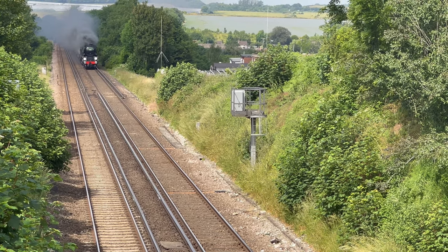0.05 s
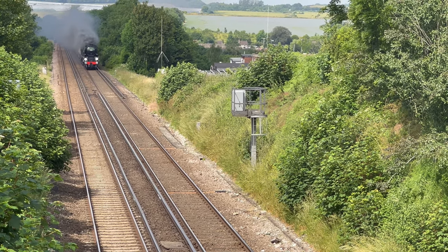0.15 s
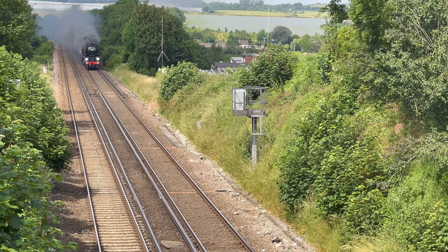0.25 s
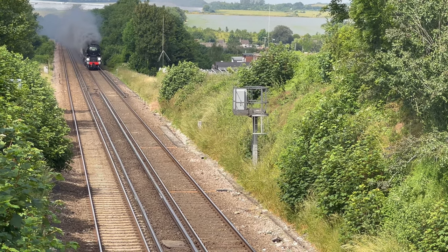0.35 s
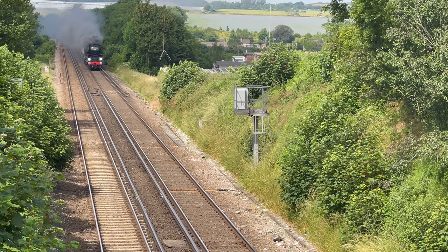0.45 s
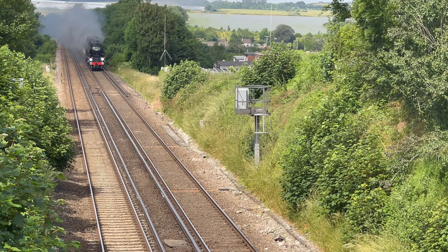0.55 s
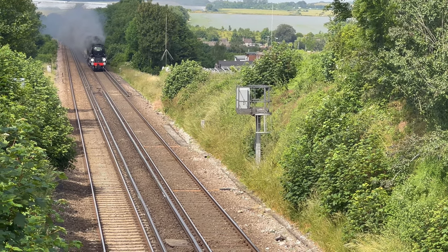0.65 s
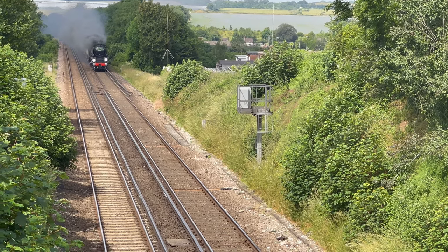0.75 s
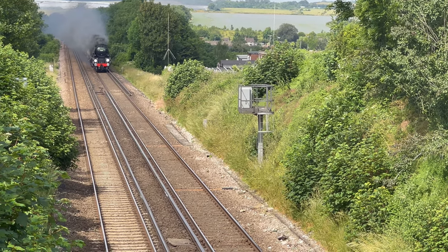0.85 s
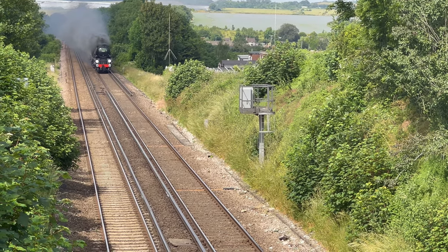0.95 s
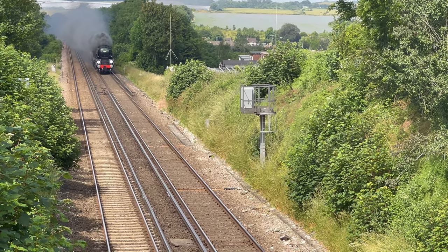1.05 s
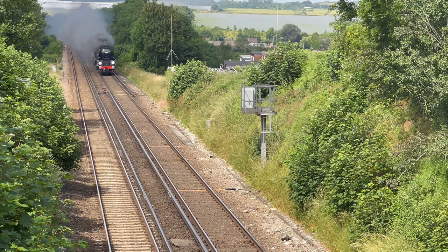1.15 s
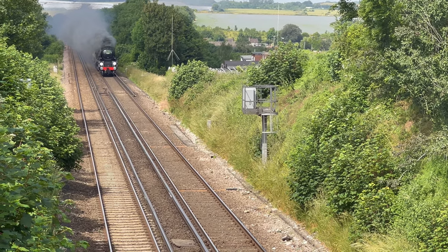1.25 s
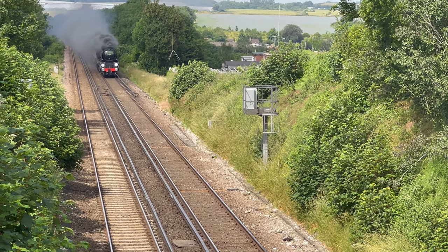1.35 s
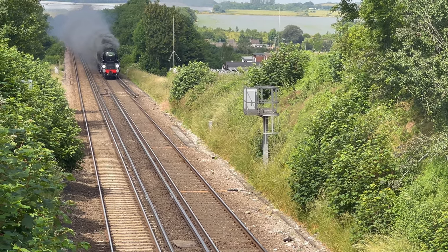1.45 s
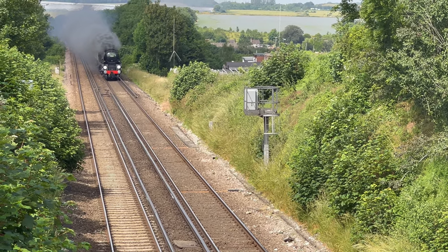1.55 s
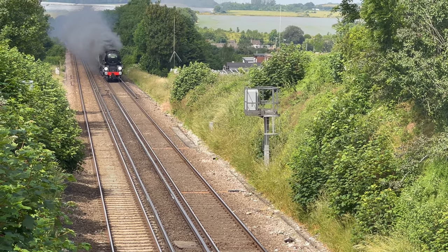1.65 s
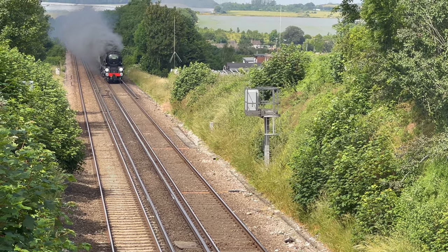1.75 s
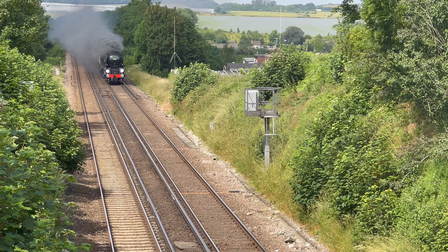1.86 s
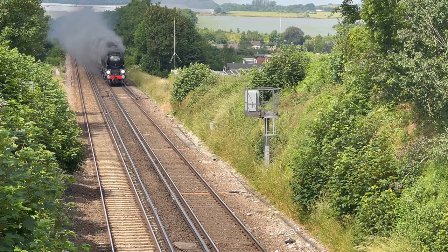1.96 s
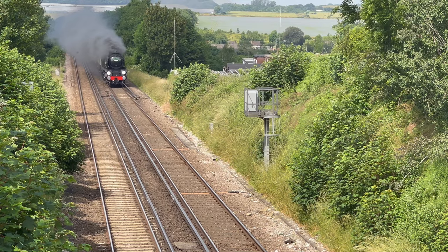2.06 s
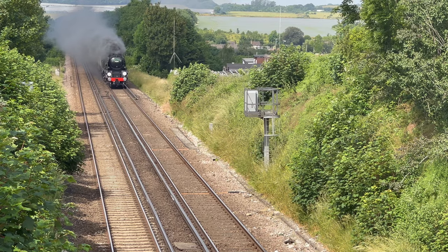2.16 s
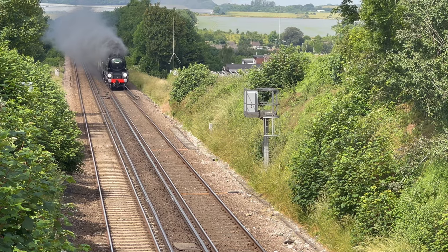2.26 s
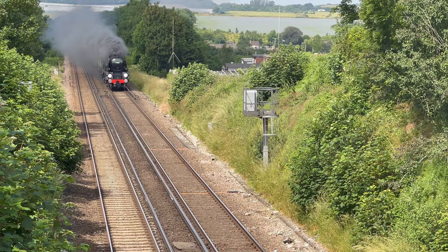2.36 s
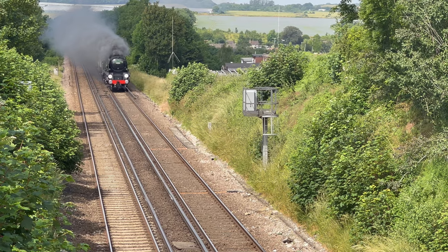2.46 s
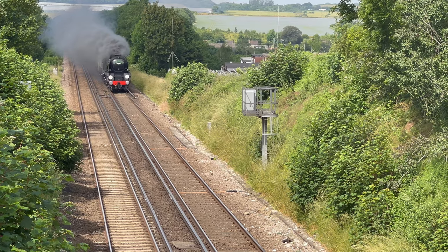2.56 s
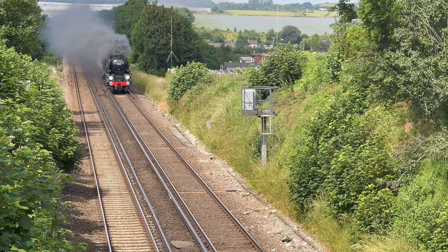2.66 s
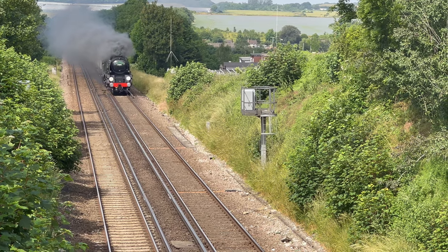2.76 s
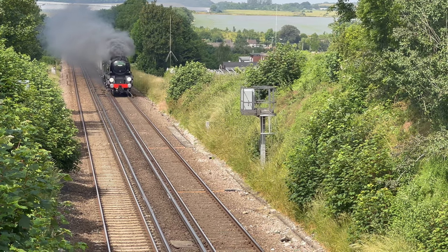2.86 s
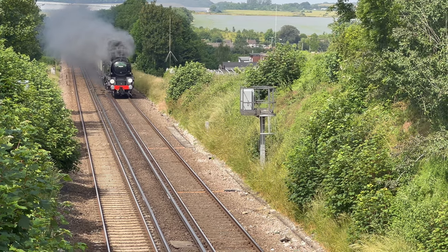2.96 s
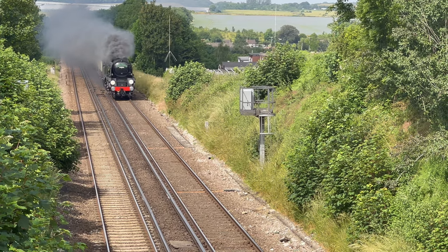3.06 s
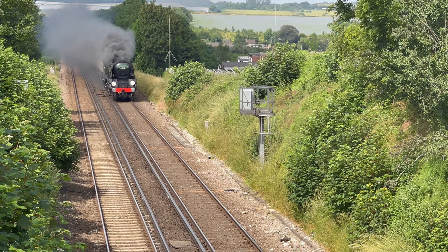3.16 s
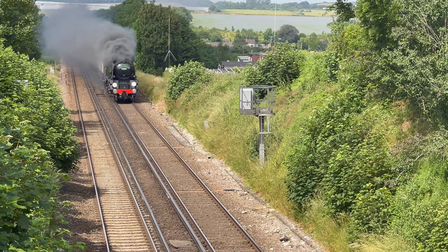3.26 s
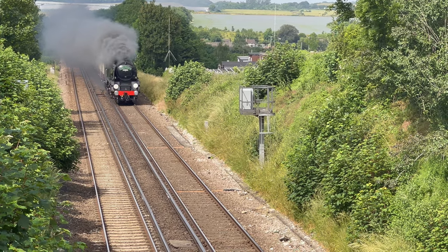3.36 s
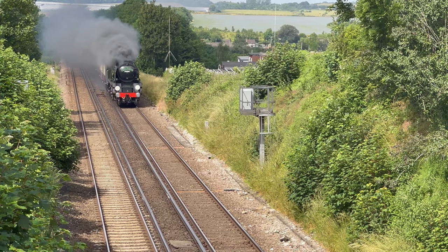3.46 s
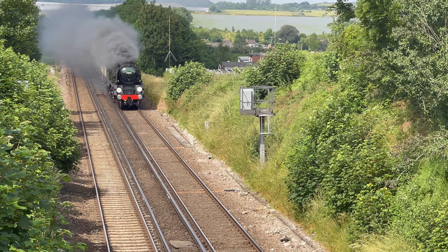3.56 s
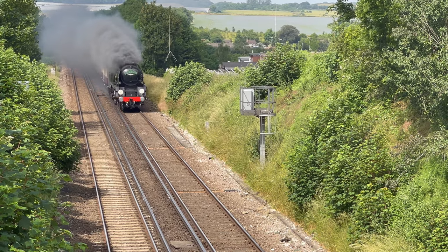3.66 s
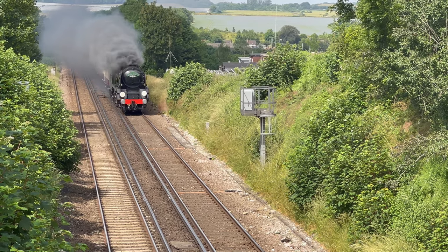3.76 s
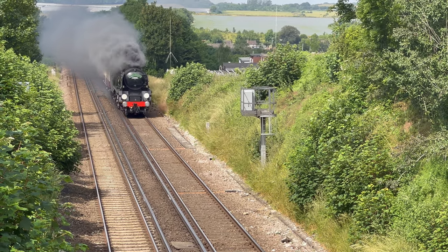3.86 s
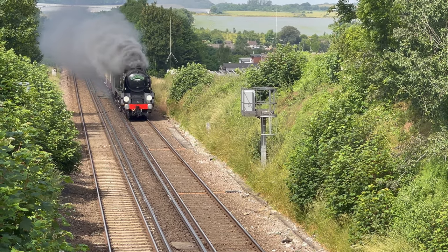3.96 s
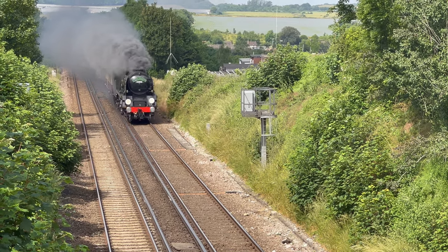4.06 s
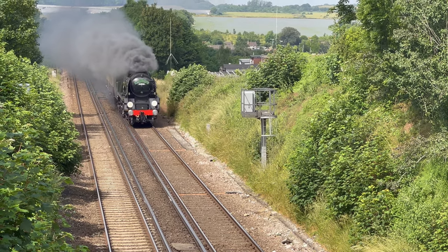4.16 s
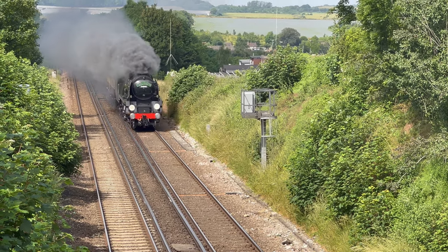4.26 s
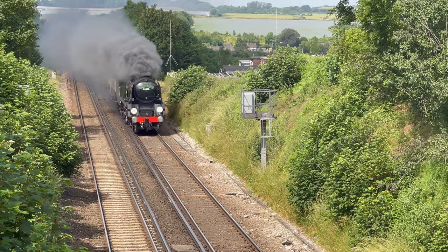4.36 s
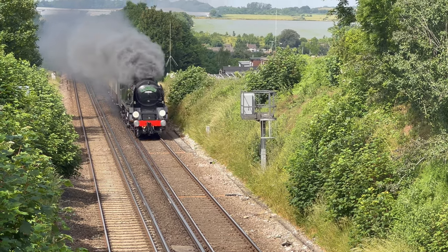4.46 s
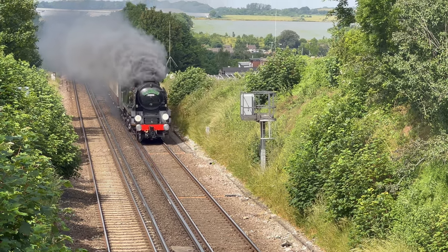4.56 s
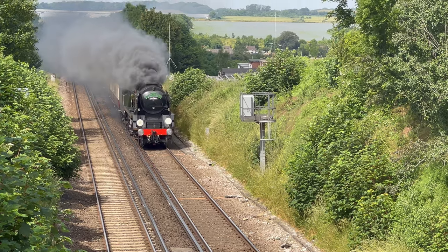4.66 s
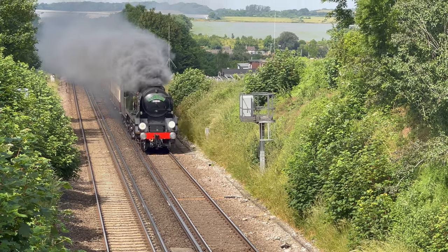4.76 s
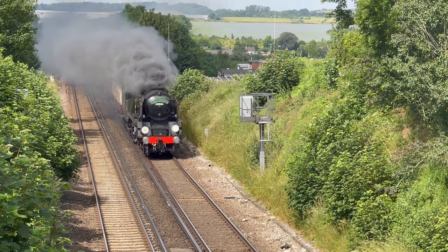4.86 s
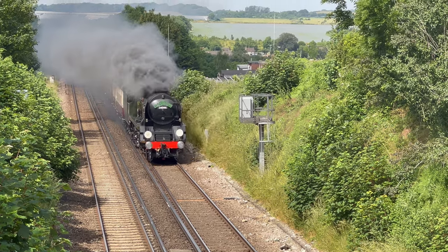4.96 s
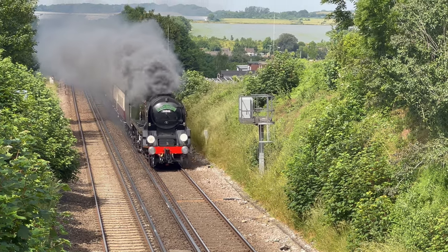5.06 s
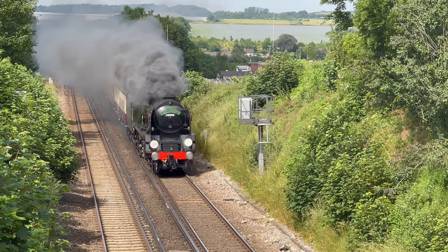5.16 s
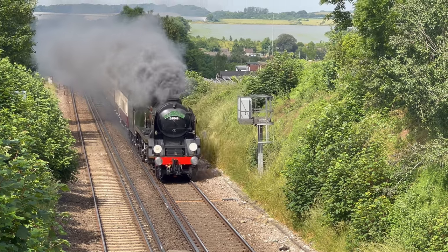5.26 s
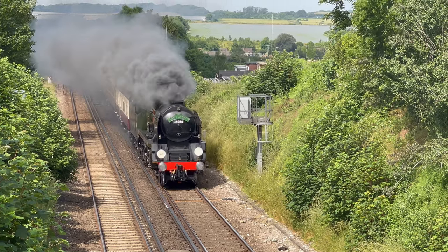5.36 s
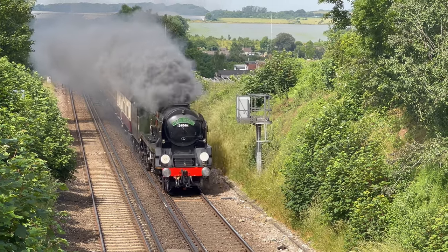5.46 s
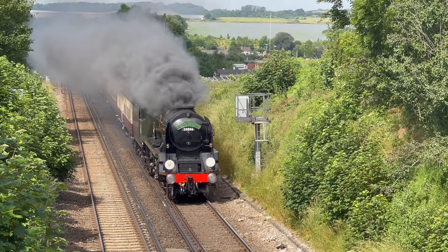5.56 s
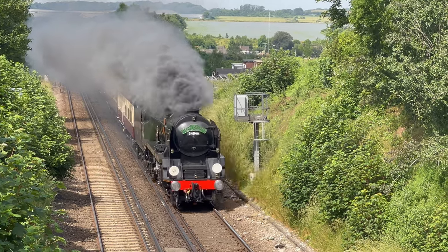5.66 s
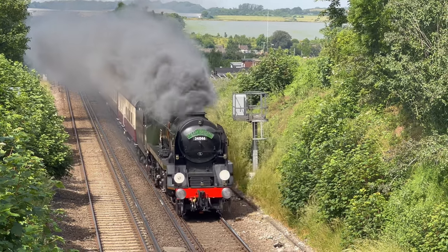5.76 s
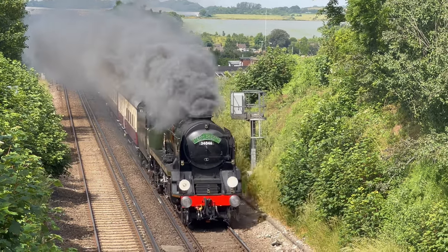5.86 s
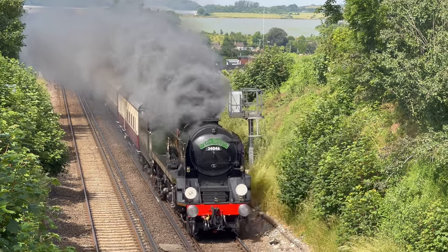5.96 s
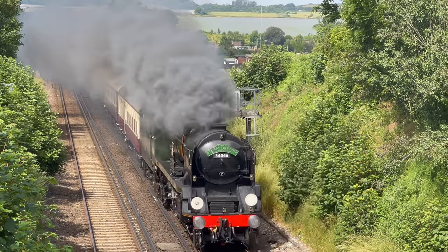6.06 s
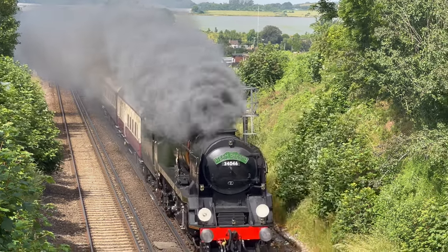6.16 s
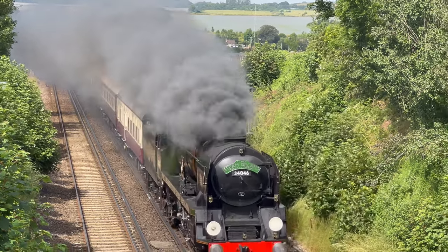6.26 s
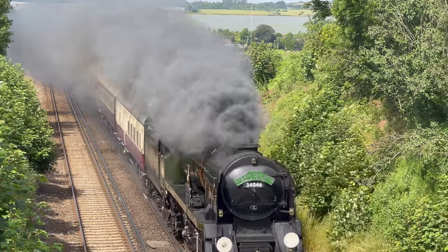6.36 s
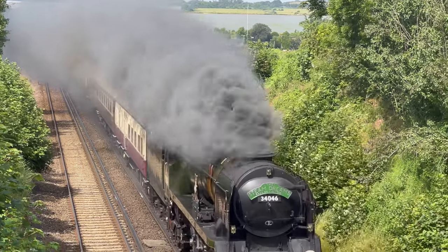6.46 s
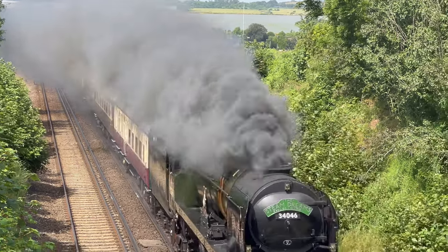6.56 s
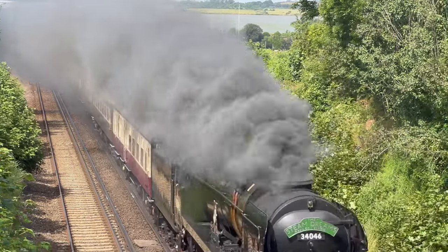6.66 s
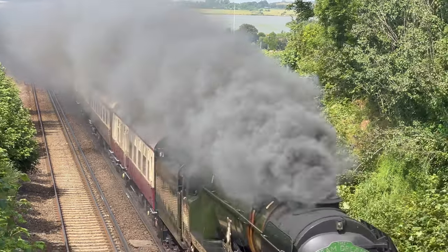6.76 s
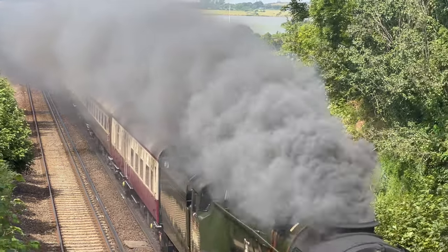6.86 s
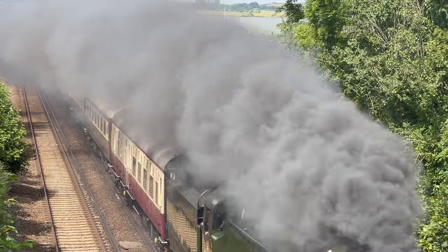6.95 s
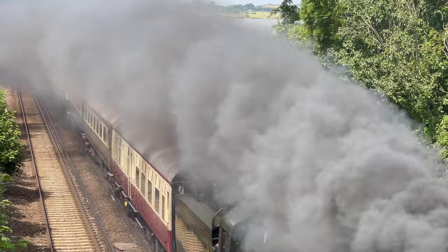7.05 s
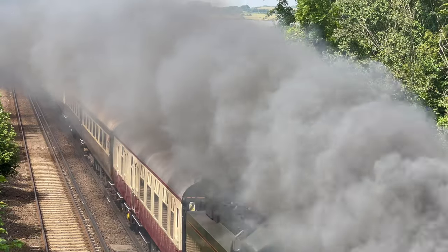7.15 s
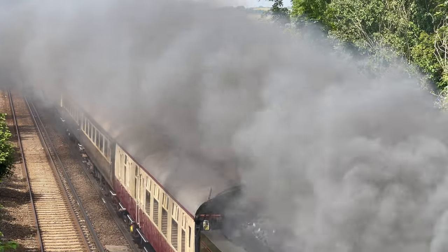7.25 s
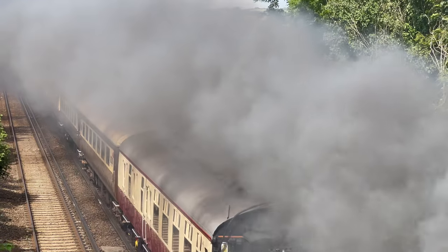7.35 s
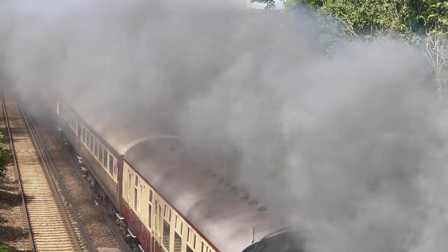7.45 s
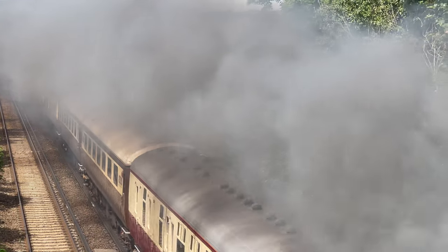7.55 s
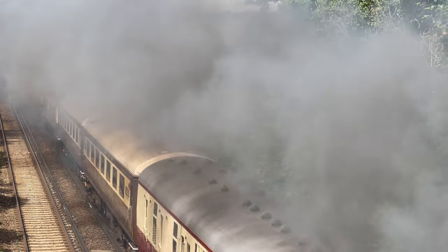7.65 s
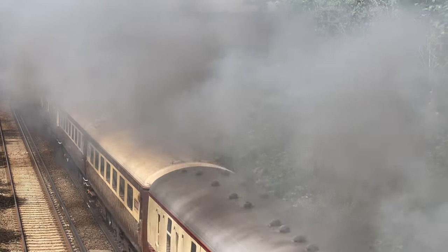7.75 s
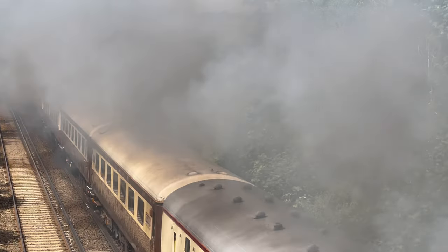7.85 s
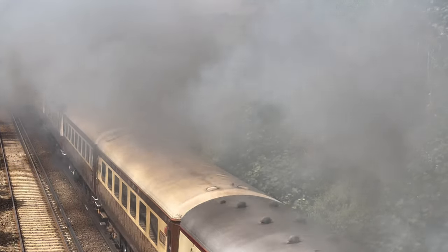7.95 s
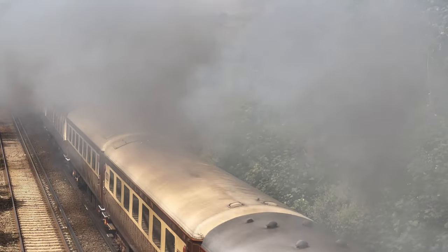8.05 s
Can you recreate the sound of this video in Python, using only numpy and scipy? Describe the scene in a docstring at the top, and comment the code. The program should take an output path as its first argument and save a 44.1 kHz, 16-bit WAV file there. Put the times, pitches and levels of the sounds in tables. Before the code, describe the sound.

A road vehicle drones by, slows and fades to the right. Far off, a steam locomotive chuffs in a rapid, low rhythm, growing steadily louder with a roar, wheel noise and hiss. The rails sing ahead of it, a few wheel clanks ring out and two soft knocks sound nearby. Heard from a bridge over a cutting, the engine passes directly below with a bright spurt of steam and a hollow boom, coaches rolling behind.

```python
"""A road vehicle drones past and slows, while far off a steam locomotive works up a cutting towards a bridge.
Its exhaust rings the chimney in thuds, about seventeen a second, over roar, wheel noise and steam hiss.
The rails sing ahead of it, wheels clank over rail joints and two soft knocks sound close by.
A little after seven seconds the engine passes under the listener with a bright spurt of steam
and a hollow boom, coaches behind it."""
import sys
import numpy as np
from scipy import signal
from scipy.fft import rfft, irfft, next_fast_len
from scipy.io import wavfile
from scipy.ndimage import uniform_filter1d

SR = 44100
rng = np.random.default_rng(int(sys.argv[2]) if len(sys.argv) > 2 else 0)


def bounce(signal):
    """Save signal as a 16-bit WAV file at the path given by the first command-line argument."""
    frames = np.transpose(np.atleast_2d(signal))
    limited = np.clip(frames, -1, 1)
    pcm = np.round(limited * 32767).astype(np.int16)
    wavfile.write(sys.argv[1], SR, pcm)


N = 357210
TIME_S = np.arange(N) / SR
FRAME, HOP = 1024, 256  # samples
BIN_HZ = np.fft.rfftfreq(FRAME, 1 / SR)
FRAME_S = np.arange(N // HOP + 5) * HOP / SR
SPEED_M_S, PASS_S, CLOSEST_M = 16.1, 7.334, 5.04  # the locomotive's run, heard at the bridge
NEARNESS = np.interp(FRAME_S, [5.6, 6.4], [0, 1])

# How alike the train's noise sounds in left and right: frequency_hz, coherence
STEREO_COHERENCE = [(60, .99), (300, .96), (1000, .92), (1450, .85), (2050, .99), (3300, .89), (5200, .92),
                    (5900, 1), (8800, 1), (9100, .9), (10250, 1), (11000, .96), (12000, 1), (13000, .7)]


def exhaust_beats():
    """Quasi-periodic pulses: three unequal cylinders exhaust in turn. Rows: peak_s, level_db, pitch_hz."""
    # Beats that stand out of the rhythm: peak_s, level_db
    heavy_beats = [(2.851, -23), (3.11, -25), (3.814, -22), (4.146, -25), (4.797, -20), (4.845, -21),
                   (5.161, -20), (5.548, -20), (5.864, -18), (6.106, -17), (6.293, -13.5), (6.699, -13),
                   (7.105, -16), (7.292, -10), (7.428, -9.5), (7.618, -11.5), (8.069, -16)]
    beats_per_s, hard_beat_s, cylinder_db = 17, 5.353, (-0.5, -1.5, -3.5)
    chimney_hz, near_rise_hz = 52.2, 8.6
    jitter_s, scatter_db, scatter_hz = 0.0048, 1.5, 4.5
    count = np.arange(-90, 50)
    later, louder, higher = rng.standard_normal((len(count), 3)).T
    peak_s = hard_beat_s + count / beats_per_s + jitter_s * later
    level_db = passing_level(peak_s, closest_db=-14.5, coming_power=0.6, leaving_power=0.5)
    level_db += np.take(cylinder_db, count % 3) + scatter_db * louder
    pitch_hz = chimney_hz + np.interp(peak_s, [6.3, 6.9], [0, near_rise_hz]) + scatter_hz * higher
    for heavy_s, heavy_db in heavy_beats:
        nearest = round((heavy_s - hard_beat_s) * beats_per_s) - count[0]
        peak_s[nearest], level_db[nearest] = heavy_s, heavy_db
    return np.transpose([peak_s, level_db, pitch_hz])[(peak_s > .1) & (peak_s < N / SR)]


def chimney_thuds(beats):
    """Pulse-excited resonance: each push of exhaust rings the chimney for a few cycles of sagging pitch."""
    out, t = np.zeros(N), np.arange(-.05, .12, 1 / SR)
    rise_s, fall_s = .016, .027
    envelope = np.exp(-(t / np.where(t < 0, rise_s, fall_s)) ** 2)
    for (peak_s, level_db, pitch_hz), offset in zip(beats, .12 * rng.standard_normal(len(beats))):
        cycles = pitch_hz * (t - 2 * t ** 2) + offset
        add(out, peak_s + t[0], gain_of(level_db) * envelope * np.cos(2 * np.pi * cycles))
    return out


def puffing(beats):
    """Amplitude modulation: a brief bump, 1 high, at every exhaust beat."""
    return sum(np.exp(-((FRAME_S - peak_s) / 0.01) ** 2) for peak_s in beats[:, 0])


def chimney_roar(beats):
    """Modulated broadband noise: the roar puffs with the beats and fills out as the engine nears."""
    # Spectrum of the distant roar: frequency_hz, density_db
    far_spectrum = [(50, -21), (85, 7), (120, -9), (165, 0.5), (210, 1.5), (310, -5), (400, -4.5),
                    (490, -12), (600, -4.5), (720, -6), (900, -16.5), (1170, -29), (1980, -120)]
    # Change in that spectrum at close range: frequency_hz, gain_db
    near_change = [(60, 6), (95, -4.5), (125, 4.5), (170, -3), (220, -3.5), (330, -1), (500, -0.5),
                   (900, -5.5)]
    floor_db = -43
    passing_db = passing_level(FRAME_S, closest_db=-13.5, coming_power=1.08, leaving_power=0.5)
    level_db = 20 * np.log10(np.hypot(gain_of(passing_db), gain_of(floor_db)))
    fuller_db = NEARNESS * at_hz(near_change)[:, None]
    puff_db = (0.36 + 0.41 * NEARNESS) * puffing(beats)
    return noise(far_spectrum, level_db + fuller_db + puff_db, at_hz(STEREO_COHERENCE),
                 patchy_db=0.6 + 0.92 * NEARNESS, flicker_db=0.5)


def wheel_noise():
    """Rolling noise: it grows as the engine nears, and the coaches keep it loud afterwards."""
    # Spectrum of the engine's wheels: frequency_hz, density_db
    spectrum = [(240, -3), (400, -5), (624, -9), (769, -5), (939, -7.5), (1400, -10), (1740, -15),
                (2260, -17.5), (3500, -24), (4550, -35), (7700, -120)]
    # How the coach wheels differ: frequency_hz, gain_db
    coach_change = [(400, -1), (800, 2.5), (1400, 3.5), (1650, -4.5), (2300, 2), (3500, -3.5)]
    level_db = passing_level(FRAME_S, closest_db=-14, coming_power=1.041, leaving_power=0.35)
    coach_db = np.interp(FRAME_S, [7.3, 7.7], [0, 1]) * at_hz(coach_change)[:, None]
    return noise(spectrum, level_db + coach_db, at_hz(STEREO_COHERENCE),
                 patchy_db=1.08 + 0.62 * NEARNESS, flicker_db=0.57)


def steam_hiss(beats):
    """Air absorption: distance takes treble from the puffing steam, so it is brightest at the bridge."""
    # Spectrum of the steam: frequency_hz, density_db
    spectrum = [(1500, -11), (2500, -9), (3800, -3), (5500, -2), (7500, -8.5), (9000, -8.5), (10200, -3),
                (11000, 1), (11500, -2.5), (12200, -13), (13200, -19)]
    # Course of the hiss: time_s, level_db, treble_db
    course = [(0, -51.5, -11), (1.0, -50.5, -18), (1.75, -51.5, -18.5), (2.2, -46.5, -21),
              (3.2, -42.5, -25.5), (3.8, -43, -18), (5.0, -42, -8), (5.9, -40, 7), (6.5, -36, 13),
              (6.9, -34, 17), (7.3, -33, 20), (7.45, -29.5, 18), (7.62, -31, 14), (7.8, -36.5, 8.5),
              (8.1, -44.5, 4)]
    # Share of the treble change that each frequency takes: frequency_hz, share
    absorption = [(3000, 0.096), (6500, 0.33), (8000, 0.61), (9000, 0.74), (11000, 0.77), (12500, 0.99)]
    level_db, treble_db = at_times(course, FRAME_S)
    air_db = treble_db * at_hz(absorption)[:, None]
    puff_db = 0.71 * puffing(beats)
    return noise(spectrum + [(SR / 2, -60)], level_db + air_db + puff_db, at_hz(STEREO_COHERENCE),
                 patchy_db=0.9, flicker_db=1.02)


def bridge_boom():
    """Forced resonance: low modes boom hollowly as the engine goes under the bridge."""
    # Envelope of the boom: time_s, level_db
    envelope = [(7.38, -45), (7.49, -20), (7.54, -24), (7.62, -19), (7.7, -29), (7.95, -21), (8.1, -24)]
    # Resonances of the span: frequency_hz, bandwidth_hz, gain_db
    modes = [(340, 40, 1.5), (258, 60, -6), (438, 31, -10)]
    return resonant_noise(modes, envelope) * (TIME_S > envelope[0][0])


def rail_song():
    """Narrow-band resonance: the rails sing in fuzzy tones ahead of the train."""
    # Envelope of the singing: time_s, level_db
    envelope = [(2.0, -63), (2.7, -52.5), (3.7, -47), (4.5, -44.5), (5.3, -41.5), (5.8, -49), (6.3, -71)]
    # Resonances of the rails: frequency_hz, bandwidth_hz, gain_db
    modes = [(1681, 34, -0.5), (1773, 27, -3), (1215, 26, 0), (2204, 28, -8.5), (2306, 27, -9),
             (4170, 61, -16)]
    return resonant_noise(modes, envelope)


def clanks_and_spurt():
    """Decaying noise bursts: wheel clanks at rail joints, then a bright steam spurt as the engine passes."""
    # Short noisy bursts, the last being the steam: start_s, peak_db, cutoff_hz
    bursts = [(3.617, -22.5, 3300), (3.683, -27, 2200), (4.4, -25, 1200), (5.378, -21, 1910),
              (7.403, -9, 8000)]
    # Resonances that colour every burst: frequency_hz, bandwidth_hz, gain_db
    modes = [(420, 250, 3), (720, 250, 5), (1200, 300, 0), (1780, 200, 0), (2350, 250, -7), (3200, 250, -6)]
    out, t = np.zeros(N), np.arange(.08 * SR) / SR
    decay_s = .022
    for start_s, peak_db, cutoff_hz in bursts:
        burst = rng.standard_normal(len(t)) * np.exp(-t / decay_s)
        band = signal.butter(2, [300, cutoff_hz], "bandpass", fs=SR)
        coloured = signal.lfilter(*band, resonate(burst, modes) + .1 * burst)
        add(out, start_s, gain_of(peak_db) * coloured / abs(coloured).max())
    return out


def soft_knocks():
    """Damped oscillation: each knock is a few cycles that fall quickly in pitch."""
    # Knocks close by: start_s, level_db, left_minus_right_db
    knocks = [(4.722, -25.5, 7), (4.968, -18, 5)]
    out, t = np.zeros((2, N)), np.arange(.03 * SR) / SR
    attack_s, glide_s, decay_s = .0012, .004, .01
    pitch_hz = 150 + 750 * np.exp(-t / glide_s)
    envelope = np.minimum(t / attack_s, 1) * np.exp(-t / decay_s)
    knock = envelope * np.sin(2 * np.pi * np.cumsum(pitch_hz) / SR)
    for start_s, level_db, pan_db in knocks:
        add(out, start_s, gain_of(level_db) * panned(knock, pan_db))
    return out


def road_vehicle():
    """Engine orders and rolling noise: tones tied to the firing rate sag as it slows, and all dies away."""
    # Course of the engine: time_s, firing_hz, fundamental_db
    course = [(0, 56.2, -20), (.55, 57.1, -19.5), (1.13, 58.94, -20), (1.49, 60.72, -24),
              (1.55, 59.17, -21.5), (1.76, 55.53, -26), (1.86, 52.7, -22.5), (1.91, 51.6, -30),
              (2.08, 42.56, -29), (2.4, 34.3, -50)]
    # Stereo balance of tyres and whine: frequency_hz, left_minus_right_db
    balance = [(60, -0.5), (150, -4), (350, -5), (860, 7.5), (2090, 2), (5080, -10), (12300, -4)]
    firing_hz, fundamental_db = at_times(course, TIME_S)
    cycles = np.cumsum(firing_hz) / SR
    drone = engine_drone(cycles, fundamental_db)
    whine_and_tyres = engine_whine(cycles) + tyre_noise()
    return drone + stereo_filter(whine_and_tyres, balance, phase_lead=[(0, 0.019)])


def engine_drone(cycles, fundamental_db):
    """Harmonic series: the firing tone and three exhaust overtones, more uneven as the vehicle slows."""
    # Overtone levels relative to the firing tone: time_s, second_db, third_db, fourth_db
    overtones = [(0, -32, -20, -21.5), (.6, -22.5, -20.5, -25), (1.1, -21, -27, -25), (1.4, -16, -15, -24),
                 (1.7, -18.5, -20.5, -23.5), (2.4, 0, -12, -12)]
    # The vehicle draws off to the right: time_s, left_minus_right_db
    pan = [(1.2, -0.5), (1.7, -2), (2.4, -7)]
    uneven_db = np.interp(TIME_S, [0, 1.5, 1.9], [1.2, 2.0, 4.5])
    drone = np.sin(2 * np.pi * cycles)
    for order, level_db, drift in zip((2, 3, 4), at_times(overtones, TIME_S), drifts(3, per_s=9)):
        drone += gain_of(level_db + uneven_db * drift) * np.sin(2 * np.pi * (order * cycles + .06 * drift))
    fade = np.interp(TIME_S, [2.3, 2.45], [1, 0])
    drone *= np.sqrt(2) * gain_of(fundamental_db) * fade
    return panned(drone, at_times(pan, TIME_S)[0])


def engine_whine(cycles):
    """Higher orders: wavering tones at multiples of the firing rate swell briefly as the vehicle passes."""
    # Swelling tones: firing_multiple, peak_s, half_length_s, level_db
    swells = [(13.6, 0.78, 0.28, -45), (8.1, 0.94, 0.13, -45), (14, 1.2, 0.32, -46.5),
              (8.1, 1.35, 0.092, -44), (9, 1.51, 0.11, -47), (7.4, 1.495, 0.176, -44.5),
              (10.85, 1.71, .13, -44.5), (7.9, 1.82, 0.072, -40.5), (10.6, 1.94, 0.069, -38)]
    whine = np.zeros(N)
    for (order, peak_s, half_length_s, level_db), drift in zip(swells, drifts(len(swells), per_s=25)):
        envelope = gain_of(level_db + 2.9 * drift) * np.exp(-((TIME_S - peak_s) / half_length_s) ** 2)
        whine += envelope * np.sin(2 * np.pi * (order * cycles + .14 * drift))
    return whine


def tyre_noise():
    """Rolling noise of tyres: low coherence between the channels makes it sound wide."""
    # Spectrum of the tyres: frequency_hz, density_db
    spectrum = [(180, -2.5), (350, -16), (463, -2), (728, -17), (794, -11), (1300, -8.5), (1650, -30),
                (1800, -13), (3000, -48), (3900, -62), (6600, -120)]
    # Envelope of the tyres: time_s, level_db
    envelope = [(0, -38.5), (.4, -40.5), (.8, -35), (1.3, -38.5), (1.9, -41), (2.3, -43.5), (3, -67)]
    return noise(spectrum, at_times(envelope, FRAME_S)[0], coherence=0.067, patchy_db=0.5, flicker_db=-0.5)


def passing_level(t, closest_db, coming_power, leaving_power):
    """Geometric spreading, in dB: amplitude falls as a power of distance (1 is the inverse distance law)."""
    ahead_m = SPEED_M_S * (PASS_S - t)
    spreading_db = 20 * np.log10(CLOSEST_M / np.hypot(ahead_m, CLOSEST_M))
    return closest_db + np.where(ahead_m > 0, coming_power, leaving_power) * spreading_db


def noise(spectrum, level_db, coherence, patchy_db, flicker_db):
    """Fourier synthesis of stereo noise, with drifting spectral patches and a flicker across all pitches."""
    real_a, imag_a, real_b, imag_b, patches = rng.standard_normal((len(FRAME_S), len(BIN_HZ), 5)).T
    patches = uniform_filter1d(patches, size=12, axis=0)
    patches = unit_rms(uniform_filter1d(patches, size=10, axis=1))
    flicker = unit_rms(uniform_filter1d(rng.standard_normal(len(FRAME_S)), size=5))
    coherence = np.clip(coherence, 0, 1).reshape(-1, 1)
    left = real_a + 1j * imag_a
    right = coherence * left + np.sqrt(1 - coherence ** 2) * (real_b + 1j * imag_b)
    colour = gain_of(at_hz(spectrum))[:, None]
    gain = colour / np.linalg.norm(colour) * gain_of(level_db + patchy_db * patches + flicker_db * flicker)
    return signal.istft(gain * np.array([left, right]), nperseg=FRAME, noverlap=FRAME - HOP)[1][:, :N]


def resonant_noise(modes, envelope):
    """Random excitation: white noise drives the modes, and the level follows the envelope."""
    return gain_of(at_times(envelope, TIME_S)[0]) * unit_rms(resonate(rng.standard_normal(N), modes))


def resonate(x, modes):
    """Modal superposition: the summed response of parallel resonators."""
    return sum(gain_of(db) * signal.lfilter(*signal.iirpeak(hz, hz / bandwidth_hz, SR), x)
               for hz, bandwidth_hz, db in modes)


def drifts(count, per_s):
    """Slow random signals of rms about 1: moving averages of white noise."""
    steps = rng.standard_normal((len(FRAME_S), count)).T
    slow = unit_rms(uniform_filter1d(steps, size=round(SR / HOP / per_s)))
    return [np.interp(TIME_S, FRAME_S, row) for row in slow]


def stereo_filter(x, balance, phase_lead):
    """Level and phase differences by frequency, half given to each channel."""
    size = next_fast_len(N + FRAME)
    hz = np.fft.rfftfreq(size, 1 / SR)
    left_response = gain_of(at_hz(balance, hz) / 2) * np.exp(.5j * at_hz(phase_lead, hz))
    return irfft(rfft(x, size) * [left_response, 1 / left_response], size)[:, :N]


def panned(x, pan_db):
    """Amplitude panning: left exceeds right by pan_db."""
    return np.array([x * gain_of(pan_db / 2), x * gain_of(-pan_db / 2)])


def at_hz(table, hz=BIN_HZ):
    """Interpolates a table on a log-frequency axis."""
    table_hz, values = np.transpose(table)
    return np.interp(np.log(hz + 1), np.log(table_hz + 1), values)


def at_times(table, t):
    """Interpolates each column of a table at times t."""
    table_s, *columns = np.transpose(table)
    return [np.interp(t, table_s, column) for column in columns]


def gain_of(db):
    """Decibels to amplitude ratio."""
    return 10 ** (np.asarray(db) / 20)


def unit_rms(x):
    """Scales to rms 1."""
    return x / np.sqrt(np.mean(x ** 2) + 1e-20)


def add(mix, start_s, sound):
    """Superposes a sound on the mix from start_s."""
    part = mix[..., max(round(start_s * SR), 0):][..., :sound.shape[-1]]
    part += sound[..., :part.shape[-1]]


def scene():
    """Linear superposition of train, track, knocks and road vehicle."""
    beats = exhaust_beats()
    train = chimney_roar(beats) + wheel_noise() + steam_hiss(beats) + bridge_boom() + chimney_thuds(beats)
    return train + rail_song() + clanks_and_spurt() + soft_knocks() + road_vehicle()


def record(dry):
    """Interchannel phase centres some treble bands and spreads others; saturation and a low-pass follow."""
    # Left-right level difference: frequency_hz, left_minus_right_db
    balance = [(60, 0.13), (150, 0.0), (350, 0.2), (860, 1.4), (2090, 0.0), (5080, 0.42), (12300, 0.68)]
    # Left-right phase difference: frequency_hz, left_lead_rad
    phase_lead = [(0, 0), (400, -.1), (1400, -.7), (2000, 0), (3200, .65), (3960, .45), (5300, .5),
                  (5800, 0), (8800, 0), (9100, -1.1), (9700, -2.2), (10250, -3.14), (11000, -4.5),
                  (11700, -6.28), (12300, -6.28), (13000, -8.3)]
    ceiling, cutoff_hz = .97, 13200
    heard = stereo_filter(dry, balance, phase_lead)
    saturated = heard / (1 + abs(heard / ceiling) ** 6) ** (1 / 6)
    lowpass = signal.firwin(511, cutoff_hz, window=("kaiser", 9), fs=SR)
    return signal.oaconvolve(saturated, lowpass[None], "same")


dry = scene()
out = record(dry)
bounce(out)
```